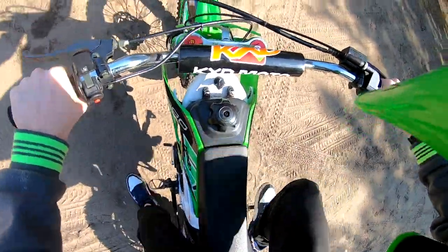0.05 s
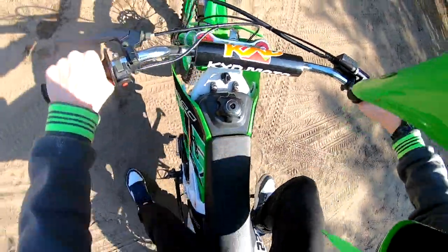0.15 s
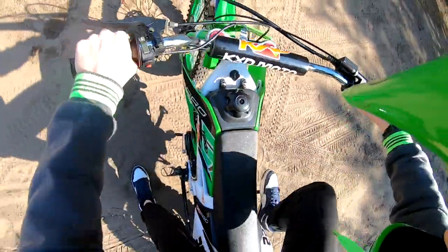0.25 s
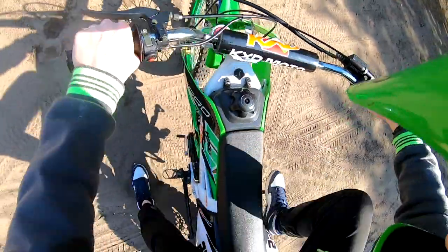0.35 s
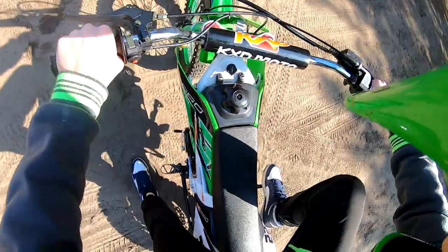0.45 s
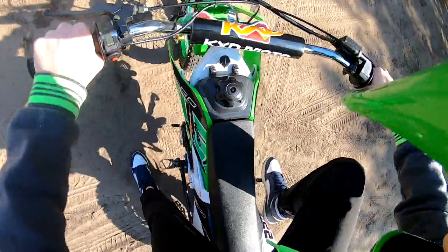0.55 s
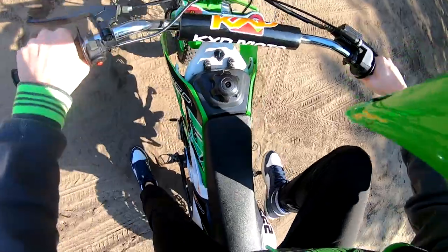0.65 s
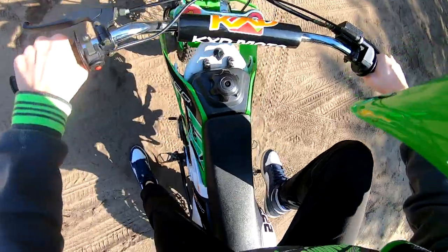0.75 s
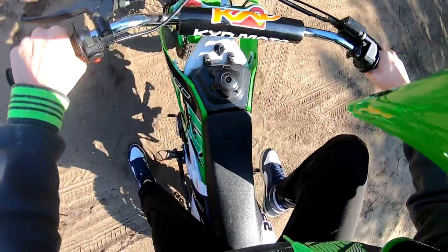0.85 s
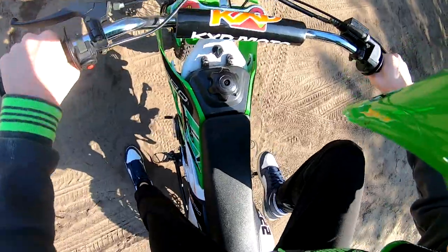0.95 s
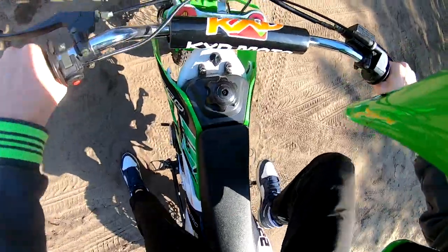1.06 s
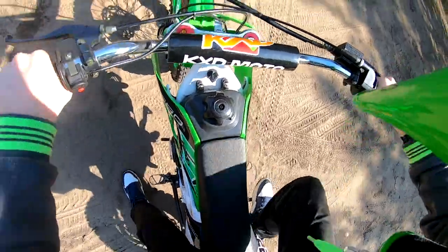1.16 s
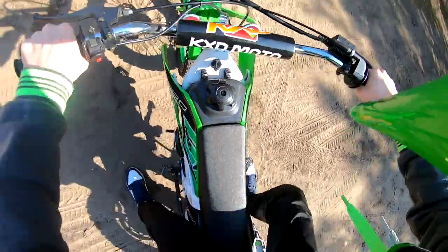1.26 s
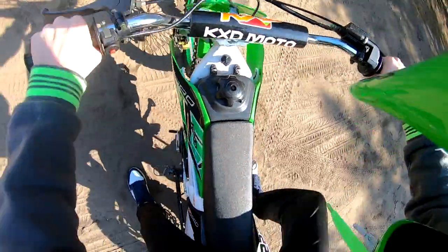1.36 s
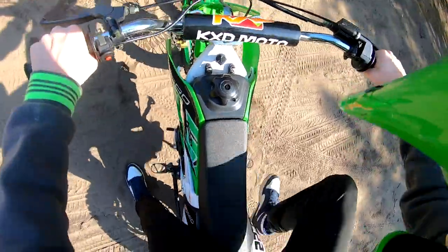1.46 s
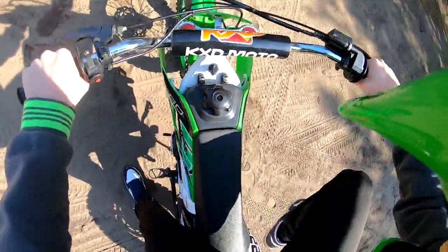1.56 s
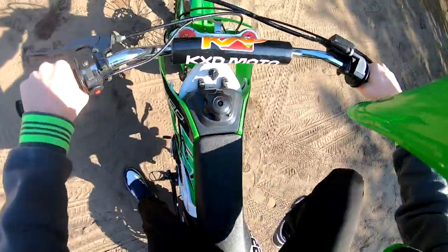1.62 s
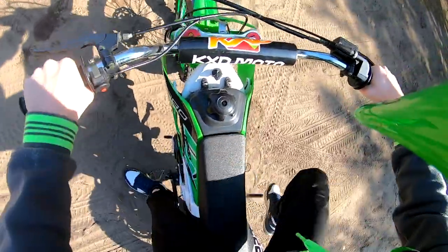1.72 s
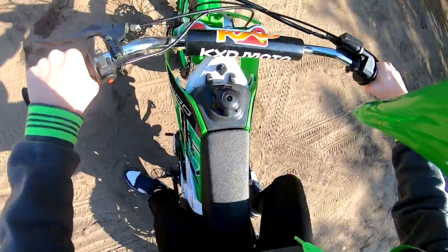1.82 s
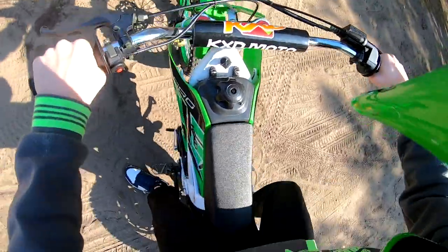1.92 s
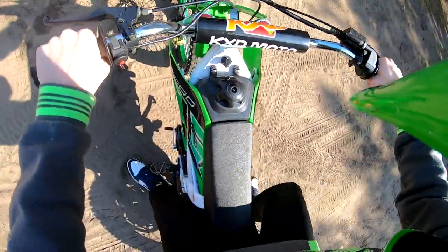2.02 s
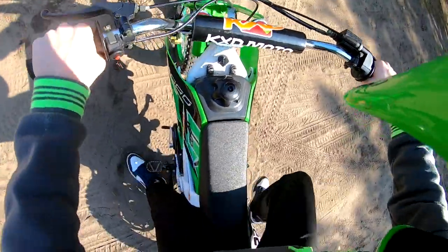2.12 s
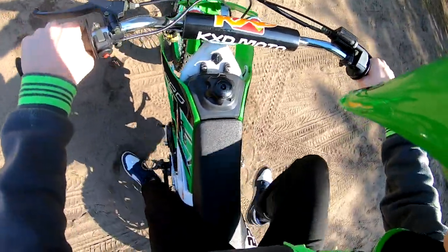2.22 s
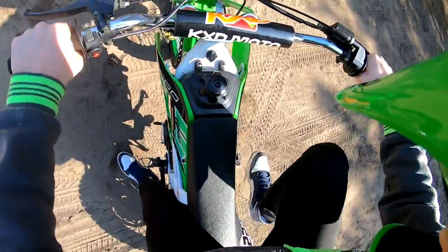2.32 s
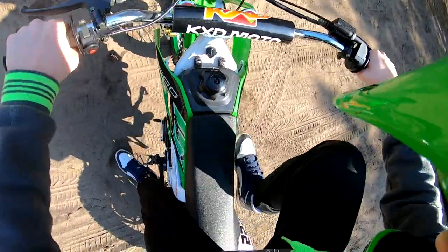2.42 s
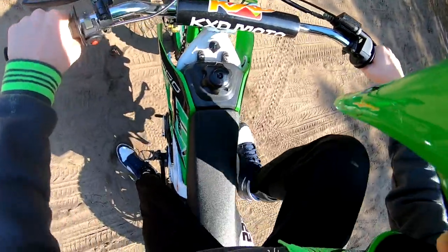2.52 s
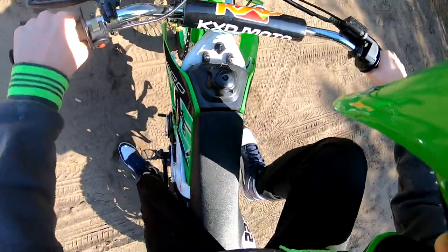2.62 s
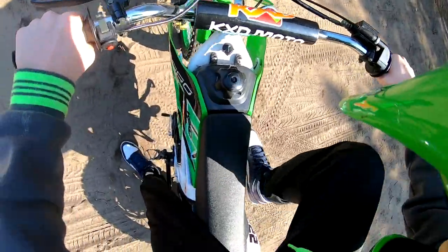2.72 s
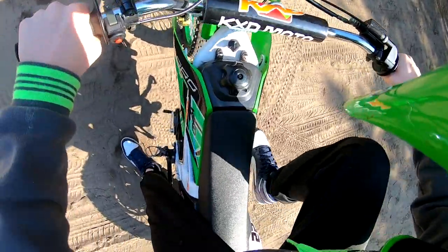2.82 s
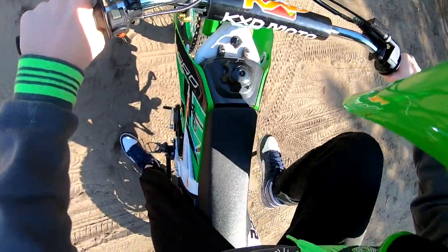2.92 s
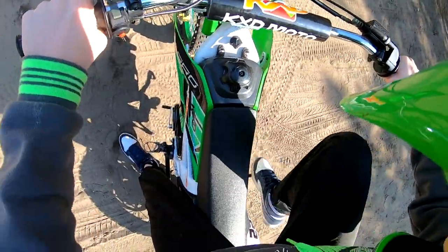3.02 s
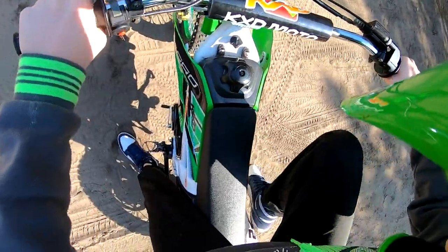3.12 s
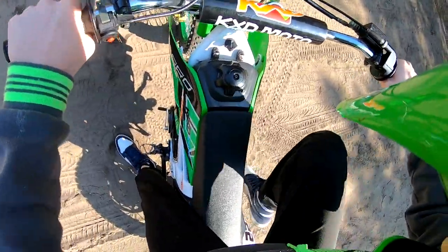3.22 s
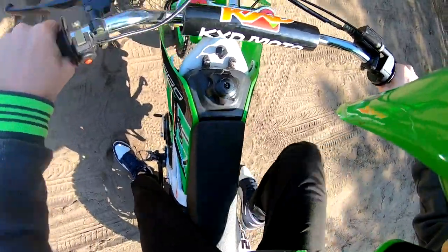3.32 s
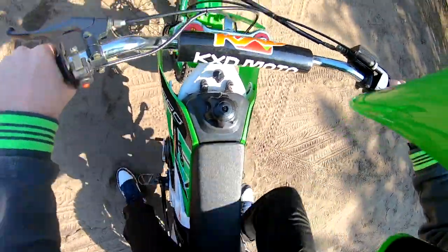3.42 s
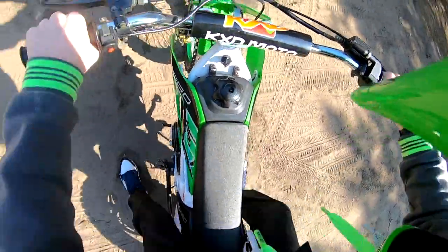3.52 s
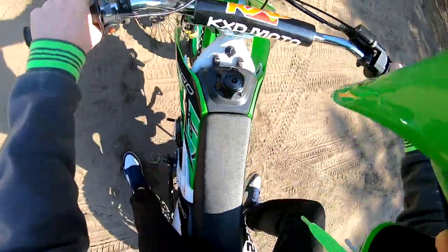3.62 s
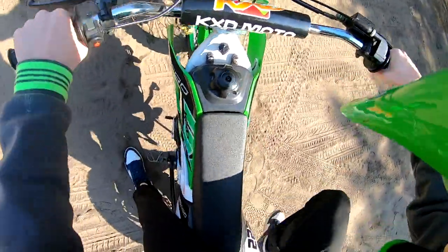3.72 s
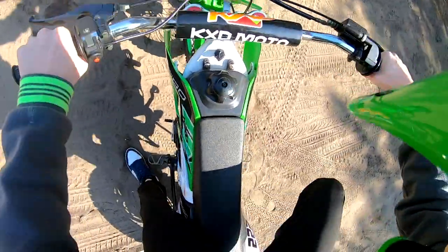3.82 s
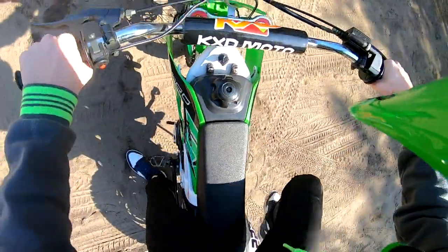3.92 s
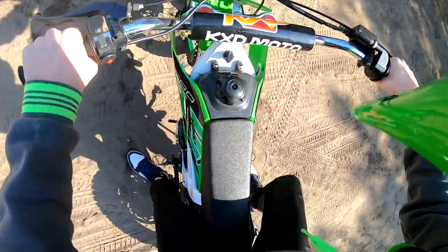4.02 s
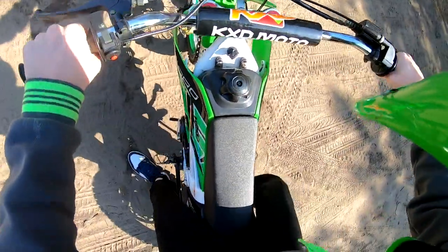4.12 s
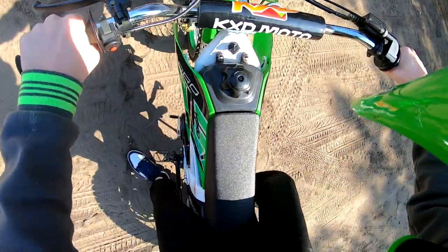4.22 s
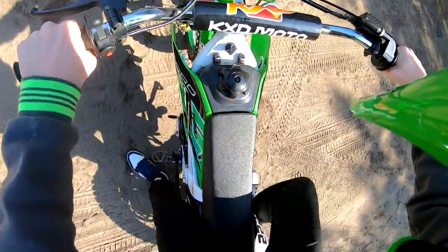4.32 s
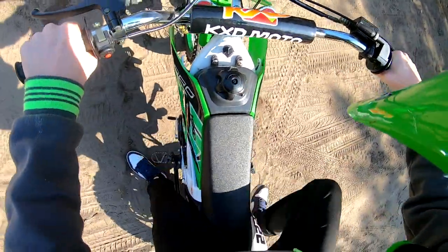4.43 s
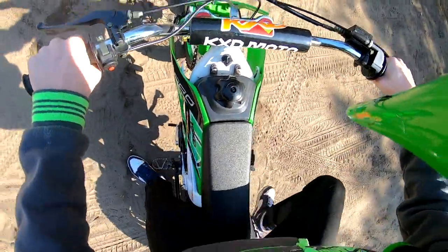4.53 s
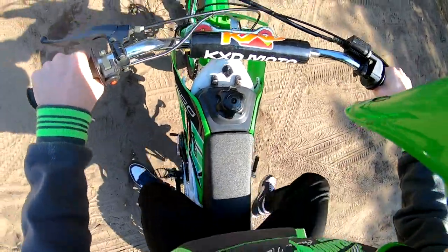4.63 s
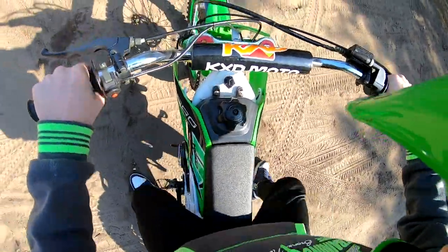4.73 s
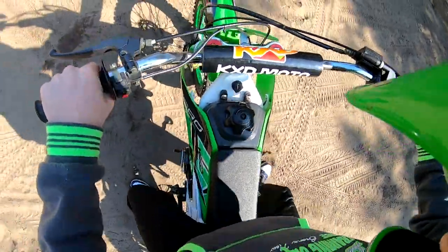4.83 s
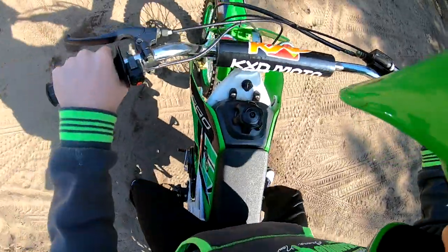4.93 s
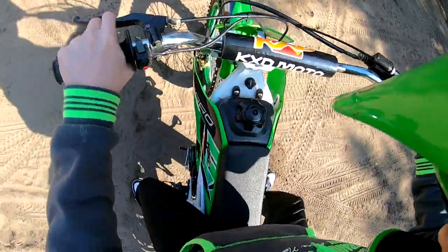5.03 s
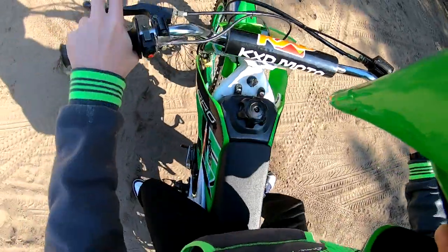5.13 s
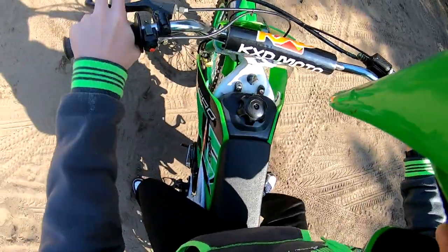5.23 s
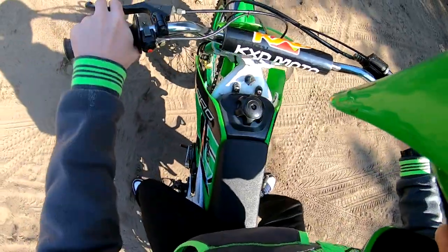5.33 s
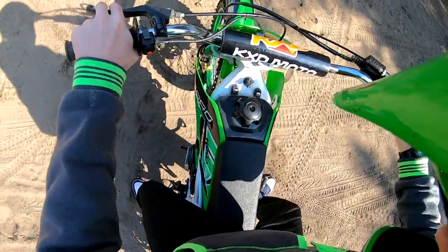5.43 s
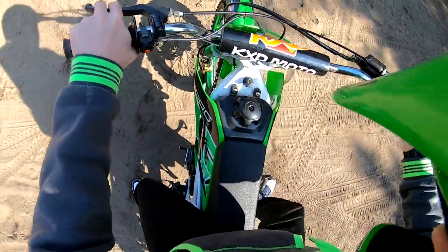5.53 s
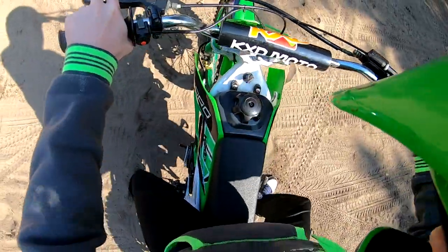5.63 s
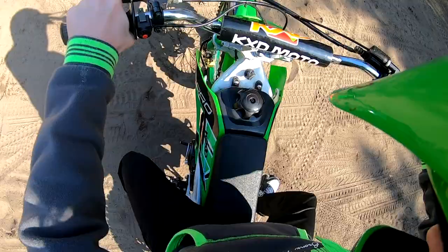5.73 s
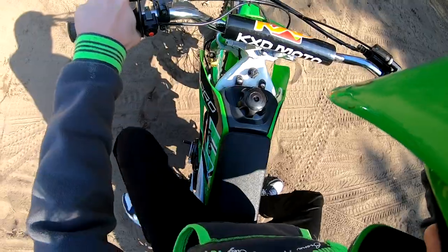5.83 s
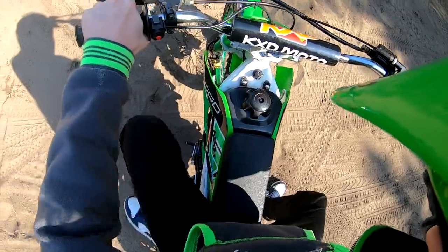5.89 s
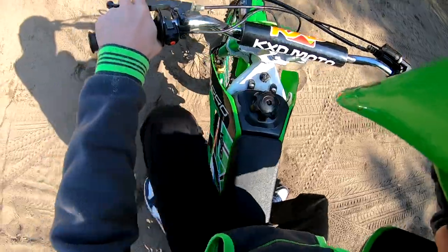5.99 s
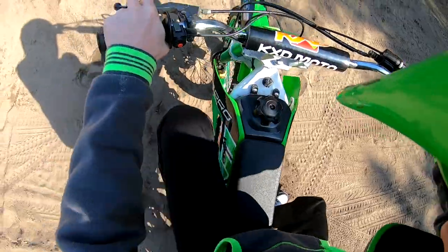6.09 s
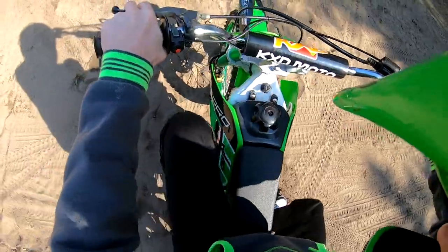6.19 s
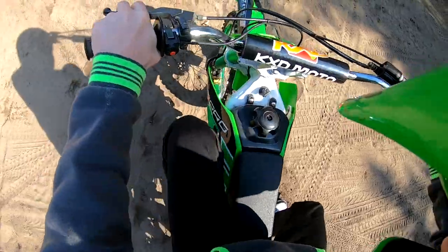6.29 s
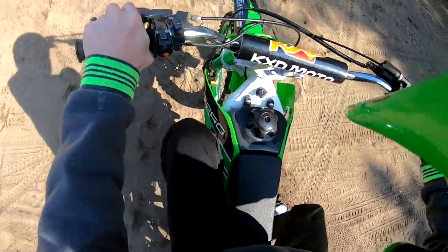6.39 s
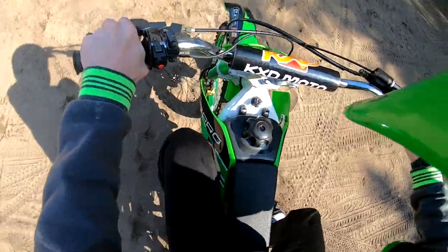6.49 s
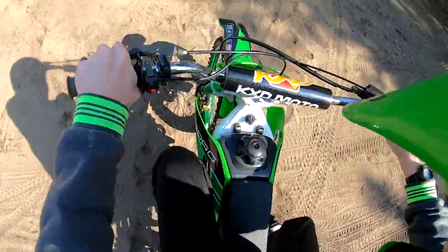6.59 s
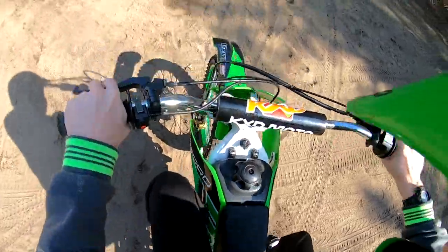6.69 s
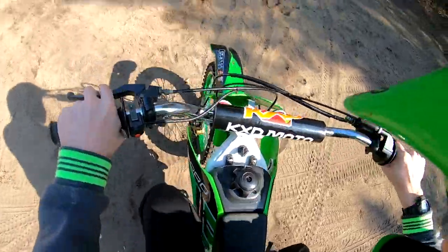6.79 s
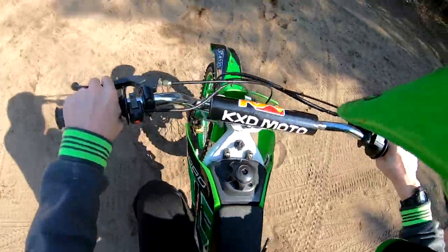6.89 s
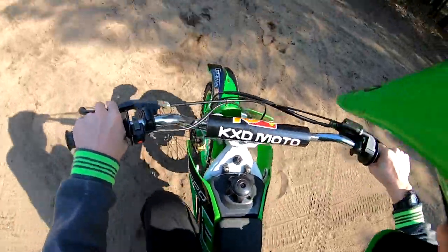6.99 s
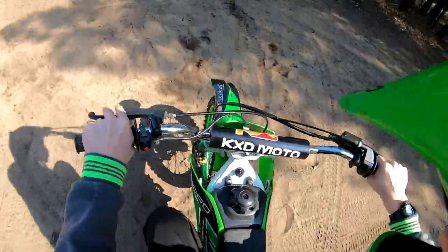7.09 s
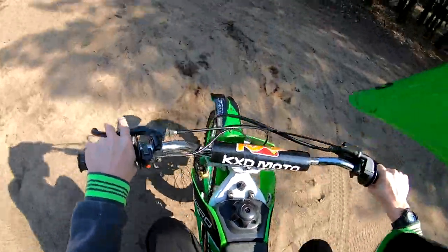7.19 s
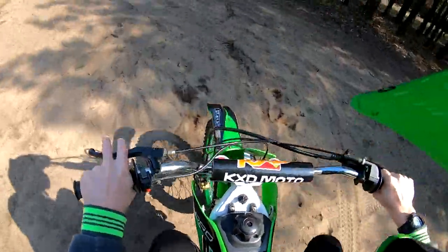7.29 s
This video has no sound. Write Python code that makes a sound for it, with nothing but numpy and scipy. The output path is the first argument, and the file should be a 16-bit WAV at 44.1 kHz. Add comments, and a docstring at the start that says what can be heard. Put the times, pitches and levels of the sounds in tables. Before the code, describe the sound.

Quiet scuffs on sand, a metallic kick lever clattering back, then a small motorcycle engine sputters into life with ratchet clicks and sharp revs.

```python
"""Open ground with sand underfoot: a small single-cylinder dirt bike, heard from a camera worn by its rider.
The first kick on the starter fails and the lever clanks back; at the second the engine catches while the
starter ratchet clatters, then it idles, stumbles and is revved to pull away. Knocks and rubbing are short
bursts of filtered noise or dying tones; ratchet, machinery and exhaust follow the turns of one crankshaft."""
import sys
import numpy as np
from scipy import signal
from scipy.io import wavfile
from scipy.ndimage import uniform_filter1d

SR = 44100
rng = np.random.default_rng(int(sys.argv[2]) if len(sys.argv) > 2 else 0)


def generate_wav(signal):
    """Clip the signal to [-1, 1] and save it as 16-bit WAV at the path in sys.argv[1]."""
    frames = np.transpose(np.atleast_2d(signal))
    scaled = np.clip(frames, -1, 1) * 32767
    pcm = np.round(scaled).astype(np.int16)
    wavfile.write(sys.argv[1], SR, pcm)


N = 324135  # samples
TIME = np.arange(N) / SR  # s

# Spectrum of small steel parts, ratchet teeth and tappet: frequency_hz, relative level_db
TOOTH_SPECTRUM = [(350, -39.5), (700, -22.5), (950, -6), (1550, -6.5), (2050, 0.5), (4300, -2.5),
                  (5500, -8.5), (8200, -14.5), (10000, -14.5), (12000, -30), (15500, -40)]


def amp(db):
    """Turns decibels into a gain."""
    return 10 ** (np.asarray(db) / 20)


def unit(x):
    """Scales to rms 1."""
    return x / np.sqrt(np.mean(x ** 2) + 1e-20)


def curve(rows):
    """Joins (time_s, value) rows by straight lines."""
    return np.interp(TIME, *np.transpose(rows))


def add(mix, s, sound):
    """Mixes a sound in at time s."""
    part = mix[max(round(s * SR), 0):][:len(sound)]
    part += sound[:len(part)]


def swell(s, db, width):
    """A smooth rise and fall around time s, down to 37 % at width seconds either side."""
    return amp(db) * np.exp(-abs((TIME - s) / width) ** 1.86)


def response(points, size=4096):
    """Causal (minimum-phase) impulse response of energy 1, with a (frequency_hz, level_db) spectrum."""
    hz, db = np.transpose(points)
    log_bins = np.log(abs(np.fft.fftfreq(size, 1 / SR)) + 1)
    log_gain = np.log(amp(np.interp(log_bins, np.log(hz + 1), db)))
    # the Hilbert transform of the log gain gives the phase
    taps = np.fft.ifft(np.exp(np.conj(signal.hilbert(log_gain)))).real[:size // 2]
    return taps / np.linalg.norm(taps)


def colour(x, points):
    """Filters one or two channels by a spectrum."""
    return signal.oaconvolve(np.atleast_2d(x), response(points)[None], axes=1)[:, :N]


def noise(points):
    """Steady noise of rms 1 with a spectrum."""
    return unit(colour(rng.standard_normal(N), points))


def uneven(size):
    """A random slow wander of rms 1, smoothed over size samples."""
    return unit(uniform_filter1d(rng.standard_normal(N), size=size))


def grit(count, spread_db):
    """Count tiny ticks at random times, each of its own pitch and size; rms 1."""
    t, out = np.arange(400) / SR, np.zeros(N)
    for when, pitch, size in rng.random((count, 3)):
        hz = 500 * 24 ** pitch  # 500 Hz to 12 kHz
        tick = np.sin(2 * np.pi * hz * t) * np.exp(-hz * t / 2)
        add(out, when * N / SR, hz * amp(spread_db * size ** 2) * tick)
    return unit(out)


def blows(rows, rise, decay, chatter):
    """Each (time_s, level_db) blow is a short gritty burst of contact, with chatter that dies more slowly."""
    t, out = np.arange(SR // 10) / SR, np.zeros(N)
    shape = (1 - np.exp(-t / rise)) * (np.exp(-t / decay) + chatter * np.exp(-t / 0.019))
    for s, db in rows:
        add(out, s, amp(db) * shape / shape.max() * rng.standard_normal(len(t)))
    return out


def metal(x, t60, tail_db, ring_db, spread):
    """Blows spread through the bike: dense quick modes, a few long rings and a faint outdoor tail."""
    # Ringing engine metal: frequency_hz, level_db (ring_db is added), t60_s
    rings = [(927.5, -22, 0.24), (2100, -33, 0.45), (2420, -32.5, 0.18), (3750, -26.5, 0.11),
             (4290, -35.5, 0.35)]
    t = np.arange(SR) / SR
    decay = amp(-60 * t / t60) + amp(tail_db - 60 * t / 0.68)
    dense = rng.standard_normal((2, len(t))) * decay
    body, scatter = dense / np.linalg.norm(dense, axis=1, keepdims=True)
    body = .5 * body
    body[0] += .87  # the direct sound
    for hz, db, ring_t60 in rings:
        ring = np.sin(2 * np.pi * hz * t) * amp(-60 * t / ring_t60)
        body = body + amp(db + ring_db) * ring / np.linalg.norm(ring)
    mid = signal.oaconvolve(x, body)[:N]
    side = signal.oaconvolve(x * rng.choice([-1, 1], N), scatter)[:N]
    side = spread * (side - 0.5 * np.roll(side, 1))  # the two ears differ most in the treble
    return np.array([mid + side, mid - side])


def crank(per_cycle=1, lag=0):
    """Times at which the turning engine passes each of per_cycle marks, lag of a mark late."""
    # The engine turning over and dying after the first kick: time_s, speed_cycles_per_s
    false_start = [(1.272, 9.2), (1.48, 7.7), (1.53, 5.6), (1.75, 4.4)]
    # From the second kick on it catches, idles, is blipped, sags and is revved: time_s, speed_cycles_per_s
    running = [(3.5255, 9.75), (3.828, 9.74), (3.904, 7.76), (3.953, 10.0), (4.359, 9.47), (4.431, 11.38),
               (4.714, 12.69), (4.916, 13.98), (5.361, 13.82), (5.476, 15.12), (5.618, 21.53),
               (5.809, 20.08), (6.137, 16.2), (6.534, 15.66), (6.641, 23.32), (6.779, 31.07),
               (6.971, 28.18), (7.06, 24.56), (7.165, 19.87), (7.35, 26.03)]
    times = []
    for speed in false_start, running:
        t = np.arange(speed[0][0], speed[-1][0], 1 / SR)
        marks = per_cycle * np.cumsum(np.interp(t, *np.transpose(speed))) / SR
        times.append(np.interp(np.arange(lag, marks[-1], 1), marks, t))
    return np.concatenate(times)


def firings():
    """One (time_s, bark_db, thump_db) a cycle: set by the throttle, uneven at light load, upset by misfires."""
    # An open throttle barks, a shut one mostly thumps: time_s, exhaust bark_db, silencer thump_db
    throttle = [(1.27, -21, -0.5), (1.52, -38, -4.5), (1.7, -41, -26.5), (3.521, -24.5, 1),
                (3.66, -19.5, -2), (4.25, -14.5, -7), (4.538, -9, -3), (5.35, -8.5, -7), (5.5, -5.5, -5),
                (5.649, -5.5, -7), (5.7, -11, 1.5), (5.879, -12, -9), (6.501, -8.5, -11.5),
                (6.559, -4.5, -2.5), (6.7, -3, -11), (6.91, -3.5, -19.5), (7.09, -7.5, -8),
                (7.31, -3.5, -7.5)]
    # The cold engine splutters: time_s, bark_change_db, thump_change_db
    misfires = [(4.05, -2, -13), (4.26, -6, -8), (5.95, -24, 7.5), (6.01, -7, -1.5), (6.07, 1.5, -15),
                (6.12, -15, 6.5), (6.31, -10, -0.5)]
    misfire_s, uneven_db = .02, 1.3  # reach either side of a misfire; scatter at a bark of -10 dB
    starts, (at, bark, thump) = crank(), np.transpose(throttle)
    bark, thump = np.interp(starts, at, bark), np.interp(starts, at, thump)
    for s, bark_change, thump_change in misfires:
        hit = abs(starts - s) < misfire_s
        bark = bark + bark_change * hit
        thump = thump + thump_change * hit
    light_load = np.clip(-bark / 10, 0, 1.5)
    charge = uneven_db * rng.standard_normal((len(starts), 2)).T * light_load
    return np.transpose([starts, bark + charge[0], thump + charge[1]])


def valve_closings():
    """The exhaust valve shuts about three tenths of a cycle after it opens, or sooner at low speed."""
    open_share, longest_open_s = .297, 0.033
    starts = crank()
    cycle_s = np.append(np.diff(starts), .04)
    return starts + np.minimum(open_share * cycle_s, longest_open_s)


def surroundings():
    """Quiet outdoor air with a far drone, and soft bumps on the camera, mostly on its left."""
    # Spectrum of the open air: frequency_hz, relative level_db
    air = [(30, 4), (100, -24.5), (178, 2), (260, -13.5), (2000, -22.5), (12000, -55.5)]
    # Bumps on the camera: middle_s, relative level_db
    bump_rows = [(.31, -37.5), (1.182, -41.5), (3.68, -32)]
    soft = [(30, -5.5), (60, -42), (150, -42.5), (3000, -69.5)]  # frequency_hz, relative level_db
    shared = noise(soft) * amp([[0], [-4]])  # left, right
    separate = np.vstack([noise(soft), noise(soft)])
    bumps = sum(swell(s, db, 0.064) for s, db in bump_rows) * (shared + 1.7 * separate)
    return amp(-57.0) * (noise(air) + .5 * np.vstack([noise(air), noise(air)])) + bumps


def scuffs():
    """Rubbing sticks and slips in uneven clumps, and sand crunches grain by grain."""
    # Shoes on sand and sleeves rubbing: middle_s, relative level_db, half_length_s
    rubs = [(0.145, -52.5, 0.11), (0.448, -46.5, 0.087), (0.708, -53, 0.063), (0.949, -53, 0.068),
            (1.279, -39, 0.078), (2.978, -54.5, 0.054), (3.262, -54, 0.053)]
    # Spectrum of rubbing cloth, soles and steel: frequency_hz, relative level_db
    sand = [(200, -19), (400, 8.5), (900, 1), (1600, 3), (3800, 0.5), (5000, -7.5), (10500, -25.5),
            (15500, -49)]
    clumps = unit(amp(5.3 * uneven(250)))
    grains = .5 * grit(count=14000, spread_db=8) + rng.standard_normal(N)
    rub = sum(swell(*row) for row in rubs) * clumps * grains
    return colour(metal(rub, 0.0027, -47.5, -6.0, 0.8), sand)


def knocks():
    """A hollow knock is one quickly dying note that sags in pitch."""
    # Sole, stones and plastic panels, each with its own note: start_s, pitch_hz (at first), relative level_db
    knock_rows = [(0.424, 199, -26), (0.682, 1210, -36.5), (2.559, 382, -31), (2.638, 240, -30.5),
                  (3.137, 344, -22), (3.169, 444, -23.5), (3.176, 165, -22.5), (3.206, 376, -28)]
    rise_s, decay_s, sag_per_s = 0.00076, 0.0083, 7.2
    t, out = np.arange(SR // 10) / SR, np.zeros(N)
    shape = (1 - np.exp(-t / rise_s)) * np.exp(-t / decay_s)
    for s, hz, db in knock_rows:
        add(out, s, amp(db) * shape * np.sin(2 * np.pi * hz * t / (1 + sag_per_s * t)))
    return out


def springs():
    """A heavy jolt leaves the springs and frame singing faintly, as slowly dying sines."""
    # Notes of springs and frame: pitch_hz, level_db (relative to the jolt), t60_s
    notes = [(184, -2, 2.4), (370, -8, 1.8)]
    # Heavy jolts: start_s, level_db
    jolts = [(.423, -45), (1.852, -41)]
    t, out = np.arange(2 * SR) / SR, np.zeros(N)
    for s, jolt_db in jolts:
        for hz, db, t60 in notes:
            add(out, s, amp(jolt_db + db - 60 * t / t60) * np.sin(2 * np.pi * hz * t))
    return out


def clanks():
    """Lever and pedals hit their stops or grind: steel rings and the frame thuds."""
    # Clanks of lever, pedal and frame: start_s, relative ring_db, relative thud_db
    clank_rows = np.array([(0.157, -36, -44), (0.274, -48, -41.5), (0.399, -33, -36), (0.479, -36, -39.5),
                           (1.172, -38.5, -70), (1.3631, -16, -26.5), (1.776, -18, -55), (1.8213, -18, -51),
                           (1.8367, -12.5, -24), (1.852, -13.5, -25), (1.953, -21, -36),
                           (2.023, -27, -39.5), (2.534, -43.5, -44), (2.636, -45.5, -43),
                           (3.0795, -28, -49), (3.1026, -21, -47), (3.1226, -26, -39), (3.1933, -34, -35.5),
                           (3.5798, -11, -22.5), (4.569, -23, -39), (4.639, -27, -55), (6.784, -29.5, -55)])
    # Teeth grinding over their tips as the lever is let up: time_s, relative level_db
    grind_level = [(4.31, -53), (4.35, -29.5), (4.45, -27), (4.485, -19), (4.53, -43)]
    # Spectrum of the steel lever: frequency_hz, relative level_db
    lever_spectrum = [(240, -26), (400, -15), (914, -2), (3850, -3), (10700, -27), (15500, -47)]
    # Spectrum of the thudding frame: frequency_hz, relative level_db
    thud_spectrum = [(40, -15), (260, -5), (600, -13.5), (3000, -47)]
    grinding = (grind_level[0][0] < TIME) * (TIME < grind_level[-1][0])
    scrape = unit(grit(count=20000, spread_db=9.5) + rng.standard_normal(N))
    grind = amp(curve(grind_level)) * grinding * scrape
    struck = amp(-2.5) * blows(clank_rows[:, [0, 1]], 0.00037, 0.0036, 1.0)
    ring = colour(metal(struck + grind, 0.034, -23.5, -1, 0.56), lever_spectrum)
    thud = colour(blows(clank_rows[:, [0, 2]], 0.00059, 0.039, 0.25), thud_spectrum)
    return ring + amp(-1.0) * thud


def ratchet():
    """While the lever is held down, the engine skips over five teeth in every cycle; each tooth bounces."""
    # Lever held on its ratchet: start_s, end_s, relative level_db, fade_db_per_s (negative grows)
    held = [(1.379, 1.65, -19.5, 25), (3.592, 4.35, -24, -1.5)]
    lag_teeth, scatter_db = 0.24, 1.54  # the clicks trail the firing; their strength varies
    bounce_s, bounce_db = .003, -8  # mean delay and relative level of the second strike
    teeth = crank(5, lag_teeth)
    clicks = [(s, db - fade * (s - start) + scatter_db * rng.standard_normal())
              for start, end, db, fade in held for s in teeth if start < s < end]
    bounces = [(s + bounce_s * (.5 + rng.random()), db + bounce_db) for s, db in clicks]
    strikes = blows(clicks + bounces, 0.00043, 0.0046, 0.079)
    return amp(3.5) * colour(metal(strikes, 0.026, -22, 5.7, 0.63), TOOTH_SPECTRUM)


def whirr():
    """The kick spins the gear train, which growls in the cases as a swell of low noise."""
    # Full swings of the starter lever: middle_s, level_db
    kicks = [(1.273, -27.5), (3.536, -23.5)]
    growl = noise([(60, -19.0), (220, 1.5), (400, 0.0), (600, -9.5), (4000, -32.5), (15000, -83)])
    return sum(swell(s, db, 0.048) for s, db in kicks) * growl


def machinery(cycles):
    """Chain and gears churn and throb each cycle, a tappet ticks as the valve seats, the intake hisses and rasps."""
    # Rubbing and churning of the moving parts: time_s, relative level_db
    churn_level = [(1.1, -78), (1.35, -36), (1.9, -43), (2.3, -92.5), (3.4, -55), (3.6, -36.5), (4.7, -40),
                   (5.55, -38.5), (6.05, -42), (7.35, -42)]
    # Air drawn in as the throttle opens: time_s, relative level_db
    intake_level = [(5.9, -89), (6.3, -44.5), (7.1, -50)]
    # Rasp of each intake stroke, strongest as the throttle is snatched open: time_s, relative level_db
    rasp_level = [(6.42, -59), (6.52, -39.5), (6.6, -42.5), (6.78, -61)]
    # Spectrum of valve gear and crankcase: frequency_hz, relative level_db
    casing = [(290, 2), (500, -8), (997, -12), (2010, -15), (2460, -21.5), (3680, -18.5), (5200, -29.5),
              (10500, -42), (15500, -68.5)]
    clatter = 0.47  # loose ticks of chain and gears, beside their churn
    closings = valve_closings()
    level = amp(curve(churn_level))
    tappet = [(s, 3 * rng.standard_normal()) for s in closings]
    ticks = blows(tappet, 0.00092, 0.0019, 0.12)
    throb, strokes = np.zeros(N), np.zeros(N)
    for (s, bark_db, _), shut in zip(cycles, closings):
        add(throb, s, amp(bark_db) * np.exp(-np.arange(SR // 10) / SR / 0.053))
        stroke = signal.windows.tukey(round((shut - s) * 1.5 * SR))
        add(strokes, shut, stroke)  # the intake opens as the exhaust shuts
    rattle = amp(2 * uneven(300))
    parts = rattle * rng.standard_normal(N) + clatter * grit(count=3000, spread_db=15)
    churn = level * parts * (1 + throb)
    hiss = noise([(1200, -38), (1750, -6.5), (2000, 1.0), (2300, -11.5), (3200, -51)])
    intake = amp(curve(intake_level)) * rattle * hiss
    rasp = amp(curve(rasp_level)) * strokes * rattle * rng.standard_normal(N)
    gears = amp(1.8) * colour(metal(churn, 0.078, -32.5, -4, 0.63), casing)
    valves = colour(metal(amp(-3) * level * ticks + rasp, 0.021, -45.5, -2, .55), TOOTH_SPECTRUM)
    return gears + intake + valves


def exhaust(cycles):
    """Each cycle barks and rings the silencer; the closing valve checks the swing and, throttle shut, puffs most."""
    # Spectrum of the exhaust pipe: frequency_hz, relative level_db
    bark_spectrum = [(110, -44.5), (205, 2), (262, 10), (300, 7.5), (395, -0.5), (465, -24), (570, -10),
                     (720, -33), (870, -28), (1300, -54), (3000, -71)]
    # Most swing the silencer keeps once the valve has shut, on the thump scale: time_s, level_db
    tail = [(4.55, 15), (5.0, -6), (6.1, -8)]
    silencer_hz, silencer_t60_s, thump_rise_s = 119.9, 0.19, 0.002
    gulp_db, gulp_hz, gulp_decay_s = -15.5, 58.3, 0.0099  # slug of gas leaving the pipe, relative to the bark
    soft_pop_s = 0.00037  # blunting of a weak charge's edge, at a bark of -7 dB or less
    t, out = np.arange(SR // 5) / SR, np.zeros(N)
    pipe = response(bark_spectrum)
    pop = -pipe / abs(pipe).max()
    around = t[:SR // 500] - 1 / 1000  # s from the middle of the blunting window
    rise = 1 - np.exp(-(t / thump_rise_s) ** 2)
    for (s, bark_db, thump_db), shut in zip(cycles, valve_closings()):
        load = np.clip((bark_db + 10.5) / 4, 0, 1)
        blunt = np.exp(-.5 * (around / (soft_pop_s * np.clip(-bark_db / 7, 1 / 10, 1))) ** 2)
        add(out, s - .0015, amp(bark_db + 1.9) * np.convolve(pop, blunt / blunt.sum()))
        gulp = rise * np.sin(2 * np.pi * gulp_hz * t) * np.exp(-t / gulp_decay_s)
        add(out, s, amp(bark_db + gulp_db) * gulp)

        # the open valve adds the cylinder's volume to the silencer and, at light load, lowers its note
        since = t - (shut - s)
        closed = np.clip(since / 0.0041 + 1, 0, 1)
        hz = silencer_hz * (1 - 0.22 * (1 - load) * (1 - closed))
        loudest = max(amp(bark_db), amp(thump_db))
        puff = min(amp(-11.5 + 1.76 * rng.standard_normal()), loudest) * (1 - 0.5 * load)
        fading = closed * amp(-60 * since / silencer_t60_s)
        excess_db = min(np.interp(s, *np.transpose(tail)) - thump_db, 0)
        checked_db = excess_db * np.clip(since * silencer_hz, 0, 1)  # takes hold within one swing
        thump = amp(thump_db - 5.0 + checked_db - 60 * t / silencer_t60_s) * rise
        swing = thump + 0.21 * puff * fading
        add(out, s + 0.00097, -swing * np.sin(2 * np.pi * np.cumsum(hz) / SR))

        add(out, s, puff * np.exp(-(since / 0.0025) ** 2) * np.cos(2 * np.pi * 260 * since))
        # turbulent gas behind the pop
        rush = signal.fftconvolve(rng.standard_normal(len(t)) * np.exp(-t / 0.028), pipe)
        add(out, s, amp(-11) * puff * rush)
    return signal.sosfilt(signal.butter(2, 34, "high", fs=SR, output="sos"), out)


def scene():
    """The exhaust sits in the middle, the metal noises spread around it."""
    cycles = firings()
    background = surroundings() + scuffs() + knocks() + springs()
    starter = clanks() + ratchet() + whirr()
    return background + starter + machinery(cycles) + exhaust(cycles)


def record(dry):
    """The loudest peaks round off in the microphone; then the camera's band limit."""
    ceiling, edge_hz = .9, 15700
    rounded = dry / (1 + (dry / ceiling) ** 4) ** .25
    low_pass = signal.firwin(511, edge_hz, window=("kaiser", 9), fs=SR)
    return signal.oaconvolve(rounded, low_pass[None], "same", axes=1)


dry = scene()
out = record(dry)
generate_wav(out)
```